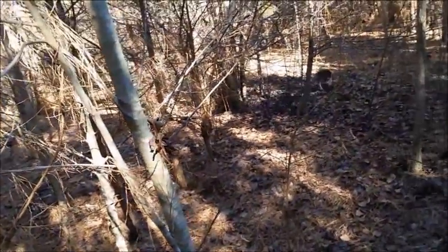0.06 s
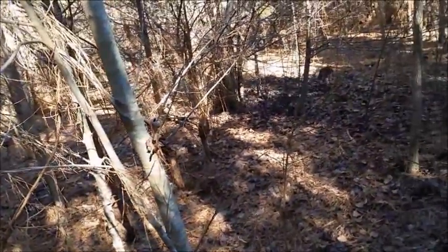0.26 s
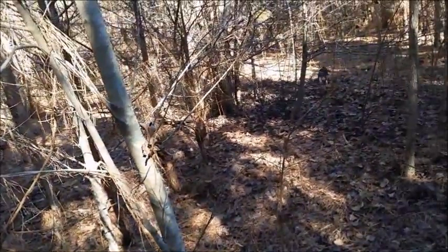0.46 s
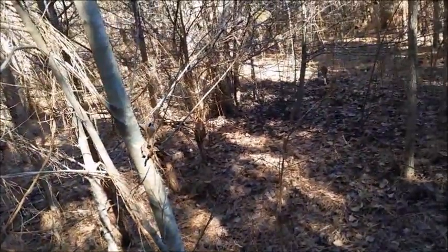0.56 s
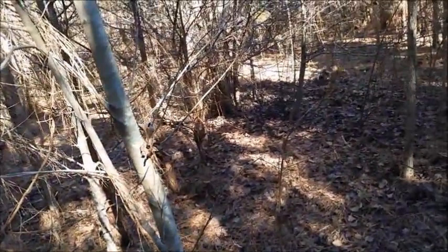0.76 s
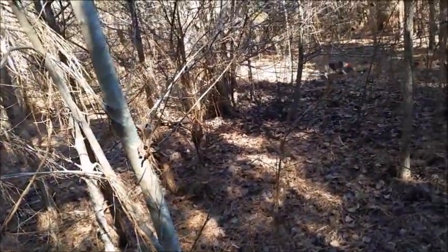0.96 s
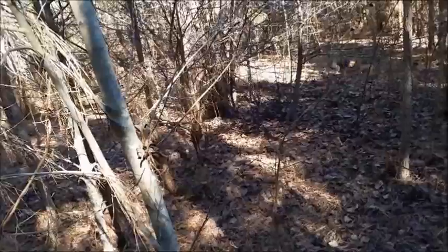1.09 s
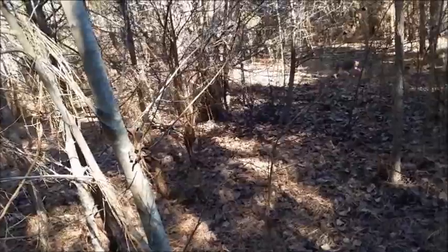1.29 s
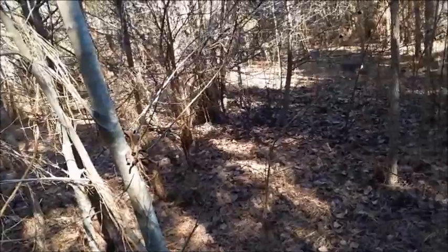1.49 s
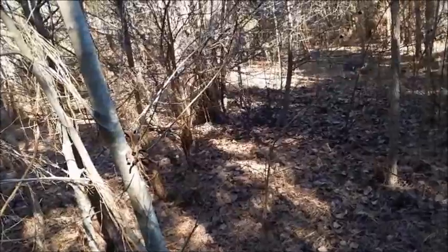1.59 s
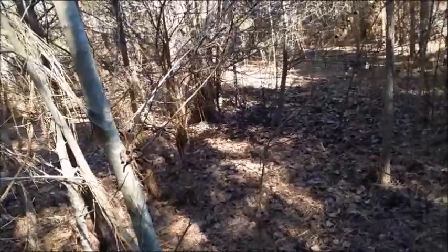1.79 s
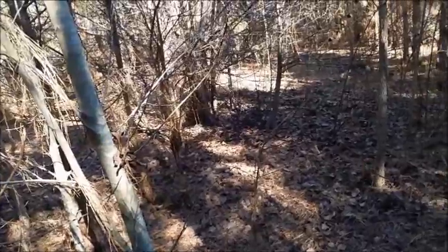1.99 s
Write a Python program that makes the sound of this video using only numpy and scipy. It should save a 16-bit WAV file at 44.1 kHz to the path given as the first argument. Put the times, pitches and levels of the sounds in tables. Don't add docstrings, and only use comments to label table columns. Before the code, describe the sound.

Two high hound bays ring softly among trees, with leaf rustle and knocks on the microphone

```python
import sys
import numpy as np
from scipy import signal
from scipy.fft import rfft, irfft, next_fast_len
from scipy.io import wavfile
from scipy.ndimage import uniform_filter1d, map_coordinates

SR = 44100
rng = np.random.default_rng(int(sys.argv[2]) if len(sys.argv) > 2 else 0)


def gain_from_db(level_db):
    decades = np.asarray(level_db, float) / 20
    return 10 ** decades


def pcm_store(signal):
    levels = np.round(np.clip(np.atleast_2d(signal), -1, 1) * 32767)
    wavfile.write(sys.argv[1], SR, levels.astype(np.int16).T)


N = 90404
TIME = np.arange(N) / SR


def unit(x):
    return x / np.sqrt(np.mean(x ** 2) + 1e-20)


def along(points, hz):
    f, v = np.transpose(points)
    return np.interp(np.log(hz + 1), np.log(f + 1), v)


def curves(rows):
    s, *cols = np.transpose(rows)
    return [np.interp(TIME, s, c) for c in cols]


def wobble(rate):
    return map_coordinates(rng.standard_normal(4000), [np.arange(N) * min(rate, 1500) / SR])


def filtered(x, response):
    m = next_fast_len(N + SR // 2)
    return irfft(rfft(x, m) * response(np.fft.rfftfreq(m, 1 / SR)), m)[..., :N]


def panned(x, pan_db):
    return np.array([x * gain_from_db(pan_db / 2), x * gain_from_db(-pan_db / 2)])


def rush(spectrum, alike, patchy_db):
    z = signal.stft(rng.standard_normal((2, N)), nperseg=512)[2]
    field = uniform_filter1d(rng.standard_normal(z.shape[1:]), size=6, axis=0)
    field = uniform_filter1d(field, size=8, axis=1)
    pair = signal.istft(z * gain_from_db(patchy_db * unit(field)), nperseg=512)[1][:, :N]

    def mid_side(hz):
        turn = np.arccos(np.clip(along(alike, hz), -1, 1)) / 2
        return gain_from_db(along(spectrum, hz)) * [np.cos(turn), np.sin(turn)]

    mid, side = filtered(pair, mid_side)
    return unit(np.array([mid + side, mid - side]))


def add_burst(out, start_s, burst):
    start = round(start_s * SR)
    out[:, start:start + burst.shape[1]] += burst


# hz, level_db_per_hz
AIR = [(250, -7.5), (700, -6.5), (1500, -16.5), (5300, -13), (6000, -62), (9300, -56), (10200, -31.5),
       (12200, -17)]


def thin_air():
    return gain_from_db(-64) * rush(AIR, [(1000, 0.026)], patchy_db=-8.5)


# hz, level_db_per_hz
RUMBLE = [(12, -48.5), (40, -7.5), (108, 4), (166, -10), (185, -12), (308, -19), (500, -28.5), (650, -61),
          (1100, -120)]
# hz, likeness_0_to_1
RUMBLE_LIKENESS = [(30, 0.093), (60, 1), (110, 0.96), (300, 0.87)]
# start_s, level_db
BREEZE = [
    (0, -64.5),
    (.45, -57.5),
    (.58, -53),
    (.9, -51.5),
    (1.05, -59),
    (1.5, -60.5),
    (2.05, -73),
]
# hz, level_db_per_hz
GUST = [(10, -28.5), (22, -8.5), (45, -3.5), (80, -17), (140, -56.5)]
HUM_PATCH_DB = .6


def rumble_and_wind():
    rumble = gain_from_db(-50.5) * rush(RUMBLE, RUMBLE_LIKENESS, HUM_PATCH_DB) * gain_from_db([[-1.5], [1.5]])
    wind = gain_from_db(curves(BREEZE)[0]) * rush(GUST, [(30, 0)], HUM_PATCH_DB) * gain_from_db([[2.5], [-2.5]])
    return rumble + wind


# hz, level_db_per_hz
INSECTS = [(2800, -22.5), (3380, -8), (4150, -3.5), (4700, -15.5), (5600, -27), (6000, -56)]
# hz, level_db_per_hz
FAINT_BANDS = [(5900, -41), (6300, -11), (6800, 0.5), (7250, -10.5), (7800, -1.5), (8300, -8.5), (9200, -2),
               (9900, -33)]
INSECT_PAN_DB = 17


def insects():
    hiss = gain_from_db(-62 + wobble(21)) * rush(INSECTS, [(4000, 0.0)], patchy_db=-2.5)
    hiss = hiss * gain_from_db([[6], [7 - INSECT_PAN_DB]])
    faint_bands = gain_from_db(-76.5) * rush(FAINT_BANDS, [(7000, .1)], patchy_db=2.5) * gain_from_db([[-6], [3]])
    return hiss + faint_bands


# start_s, level_db
DRAG = [
    (.23, -90),
    (.27, -56),
    (.56, -53),
    (.63, -60),
    (.68, -90),
]
# hz, level_db_per_hz
SCRAPE = [(7800, -50), (8400, -12), (9300, -7), (10800, 0), (12800, -24)]
# start_s, level_db
SQUEAK = [
    (0.499, -96),
    (.53, -47),
    (.58, -50),
    (.61, -92),
]
SQUEAK_HZ = 10600


def branch():
    squeak = np.sin(2 * np.pi * SQUEAK_HZ * TIME + 0.9 * wobble(80))
    squeak = gain_from_db(curves(SQUEAK)[0] + 2.5 * wobble(44)) * squeak
    scrape = gain_from_db(curves(DRAG)[0] + 0.41 * wobble(26)) * rush(SCRAPE, [(9000, 0.11)], patchy_db=5.0)
    return (scrape + squeak) * gain_from_db([[5], [-11]])


# start_s, strength_db
RUSTLE = [(0.0, -62), (.11, -52.5), (0.182, -51), (0.218, -63), (.26, -49.5), (.63, -52), (0.659, -56.5),
          (.77, -67.5), (.8, -49), (0.922, -47), (1.04, -52), (1.209, -52), (1.271, -73), (1.38, -62),
          (1.5, -73.5), (1.63, -54.5), (1.78, -70), (1.878, -62.5)]
# hz, level_db_per_hz
LEAVES = [(300, -26), (2800, -21), (5300, -30), (6000, -55), (8800, -50), (9800, -13), (10800, -3),
          (14000, 0)]
# start_s, peak_db
SNAPS = [
    (0.692, -46),
    (.791, -42),
    (1.619, -29),
    (1.905, -43),
]
# start_s, peak_db
SCUFFS = [(0.0238, -45), (0.0628, -45.5), (0.1025, -39.5), (0.179, -42), (0.2556, -35.5), (0.3574, -35),
          (0.6285, -39), (0.8215, -37), (0.9039, -36), (1.061, -38.5), (1.3623, -46), (1.5848, -44),
          (1.8642, -43)]
CRACKLE_DB, CRACKLE_RATE = -9, 350
SNAP_T60_S, SCUFF_T60_S, SCUFF_DB = .012, .11, -.5


def leaves():
    strength_db, = curves(RUSTLE + [(N / SR, RUSTLE[-2][1])])
    colour = lambda hz: gain_from_db(along(LEAVES, hz))
    hits = rng.random((2, N)) < CRACKLE_RATE / SR
    hits = hits * gain_from_db(np.minimum(4 * rng.exponential(size=(2, N)), 9))
    grain = gain_from_db(-60 * np.arange(200) / SR / .003)
    grit = signal.fftconvolve(hits, grain[None], axes=1)[:, :N] * rng.standard_normal((2, N))
    bed = rush(LEAVES, [(9000, 0.22)], patchy_db=-6.0)
    bed = bed * gain_from_db(0.93 * wobble(50.9)) * gain_from_db([[-1.2], [1.2]])
    bed = bed + gain_from_db(CRACKLE_DB) * unit(filtered(grit, colour))

    bursts = np.zeros((2, N + SR))
    t = np.arange(600) / SR
    for s, db in SNAPS:
        add_burst(bursts, s, gain_from_db(db - 60 * t / SNAP_T60_S) * rng.standard_normal((2, len(t))))
    t = np.arange(SR // 8) / SR
    for s, db in SCUFFS:
        fade = gain_from_db(db + SCUFF_DB - 60 * t / SCUFF_T60_S)
        add_burst(bursts, s, fade * rng.standard_normal((2, len(t))))
    return gain_from_db(strength_db + 6.5) * bed + filtered(bursts[:, :N], colour)


# start_s, peak_db, start_hz, t60_s, left_over_right_db (above 0 counts as 0)
BUMPS = [
    (.065, -37, 313, 0.049, 30),
    (1.023, -24.5, 190, 0.079, -1.5),
    (1.4275, -13, 348, 0.036, -25),
    (1.669, -24.5, 203, 0.029, -19),
    (1.6754, -19.5, 516, 0.043, -35.5),
]
SETTLE_HZ, SETTLE_S = 103.1, 0.0021


def bumps():
    out = np.zeros((2, N + SR))
    t = np.arange(SR // 8) / SR
    for s, db, hz, t60, pan_db in BUMPS:
        knock = t60 < .045
        pitch = hz + 0 * t
        if knock:
            pitch = SETTLE_HZ + (hz - SETTLE_HZ) * np.exp(-t / SETTLE_S)
        rise = 1 - np.exp(-t / (.002 if knock else .008))
        push = gain_from_db(db - 60 * t / t60) * rise * np.sin(2 * np.pi * np.cumsum(pitch) / SR)
        add_burst(out, s, push * gain_from_db([[min(pan_db, 0)], [0]]))
    return out[:, :N]


# hz, t60_s
WOOD = [(650, .4), (1300, .5), (1900, .33), (2600, .36), (5000, .3)]
# hz, level_db
ECHO_TINT = [(500, -4), (650, -5), (800, 2), (1300, 0), (1900, -4), (2600, -1), (3500, -1)]
ECHO_GAP_S = .07
STIR_RAD, STIR_RATE = 1.2, 55


def wood(x):
    hz, t, z = signal.stft(rng.standard_normal((2, SR)), SR, nperseg=256)
    fade_db = along(ECHO_TINT, hz)[:, None] - 60 * t / along(WOOD, hz)[:, None]
    tail = signal.istft(z * gain_from_db(fade_db), SR, nperseg=256)[1]
    tail = tail * (1 - np.exp(-np.arange(tail.shape[1]) / SR / ECHO_GAP_S))
    echo = signal.fftconvolve(x[None], tail / np.linalg.norm(tail[0]), axes=1)[:, :N]
    stir = STIR_RAD * np.array([wobble(STIR_RATE), wobble(STIR_RATE)])
    return np.real(signal.hilbert(echo, next_fast_len(N))[:, :N] * np.exp(1j * stir))


# hz, level_db
THROAT = [(250, -1.5), (500, -12.5), (720, 6.5), (1000, -2), (1290, -4), (1950, -7.5), (2600, -24),
          (3600, -32.5)]
# hz, width_hz, level_db
BREATHY = [(700, 280, -2), (1442, 570, -7), (2026, 160, -10.5), (2650, 320, -19)]
# start_s, pitch_hz, level_db
SECOND = [(.205, 685.3, -59), (.222, 700, -41), (.235, 698.5, -23), (.248, 700, -32.5), (.262, 700, -61),
          (.41, 735, -63.5), (.44, 749.4, -31.5), (.51, 755.2, -38), (.56, 700, -48), (.59, 713, -29),
          (.62, 750, -98.5), (.85, 700, -74.5), (.885, 705.4, -38.5), (.91, 750, -31.5), (.93, 727, -89)]
# start_s, slip_rad
CATCHES = [(.2405, 1.6), (.319, 1.3), (.329, -.9), (.421, .6), (.437, -.9), (.455, .5), (.479, 1),
           (.508, -.9), (.885, 1.6), (.915, 2.2)]
# start_s, level_db
MOUTH = [(.2, -4), (.26, 1), (.3, -1), (.42, -6.5), (.5, -12.5), (.53, -1.5), (.6, -2.5), (.635, 17.5),
         (.66, -9.5), (.85, 9), (.92, -10.5), (.96, 5), (.985, 7), (.995, -20.5)]
# start_s, left_over_right_db
HEAD = [
    (.2, -4.5),
    (.3, 1.5),
    (.46, 0.5),
    (.6, 4.5),
    (.86, -2.5),
    (.95, -0.5),
]
BEAT_DEPTH, SHIMMER, SLIP_RAD, AIR_DB, DRIFT_DB = .5, .35, .6, -11, 1.5
CATCH_S, DOUBLING_S, DOUBLING_DB = .0028, .007, 14
SAG_HZ, SAG_DB_PER_HZ = 600, .12
LAG_RAD, SWAY_DB, SWAY_RAD = 0.39, 0.55, 0.08
FIFTH_DB, LOWEST_DB = -15, -6


def breath(phase):
    def throat(f):
        rings = sum((-1) ** k * gain_from_db(db) * 1j * f * w / (c * c - f * f + 1j * f * w)
                    for k, (c, w, db) in enumerate(BREATHY))
        return rings * f ** 4 / (f ** 4 + 560 ** 4) / (1 + (f / 4200) ** 8)

    return unit(filtered(rng.standard_normal(N) * (1 + np.cos(phase)), throat))


def bay(rows):
    pitch, level_db, first_db, rough, half_db, third_db = curves(rows)
    second_hz, second_db = curves(SECOND)
    top_db, = curves(MOUTH)
    pan_db, = curves(HEAD)
    rough = np.clip(rough, 0, 1)
    other = 2 * np.pi * np.cumsum(second_hz) / SR + 0.2 * wobble(27)
    phase = 2 * np.pi * np.cumsum(pitch) / SR + rough * SLIP_RAD * wobble(160)
    phase = phase + sum(rad / 2 * np.tanh((TIME - s) / CATCH_S) for s, rad in CATCHES)
    half_db = half_db + DOUBLING_DB * sum(np.exp(-((TIME - s) / DOUBLING_S) ** 2) for s, _ in CATCHES)
    beat = BEAT_DEPTH * np.minimum(gain_from_db(second_db + 24.5), 1) * np.cos(other - phase)
    own_levels = {1: half_db + 8.5 + LOWEST_DB, 2: first_db, 4: 0, 6: third_db, 8: top_db,
                  10: top_db + FIFTH_DB}
    tone = np.zeros((2, N))
    for half in range(1, 11):
        k = half / 2
        db = along(THROAT, k * pitch) + DRIFT_DB * np.sqrt(k - .5) * wobble(30)
        db = db + own_levels.get(half, half_db + 7)
        db = db - (k > 2) * SAG_DB_PER_HZ * np.maximum(SAG_HZ - pitch, 0)
        turn = np.array([[.5], [-.5]]) * (-LAG_RAD * k + SWAY_RAD * k * k * wobble(9.32))
        size = gain_from_db(db) * (1 + (k - .6) * (rough * SHIMMER * wobble(110) + beat))
        both = panned(size, pan_db / k ** 2 + SWAY_DB * k * wobble(16))
        tone += both * np.sin(k * phase + k * k + turn)
    air = gain_from_db(AIR_DB) * rough * gain_from_db(1.5 * wobble(75)) * breath(phase)
    voiced = gain_from_db(level_db) * (tone + air)
    on = (TIME > rows[0][0]) & (TIME < rows[-1][0])
    gate = uniform_filter1d(1.0 * on, size=200)
    return np.sqrt(2) * gate * (voiced + gain_from_db(second_db) * np.sin(other))


# start_s, pitch_hz, level_db, fundamental_over_rest_db, roughness_0_to_1,
# half_pitch_db, third_harmonic_db
BAY = [(.203, 542, -64, 7, 0.3, -51.5, -14.5), (.215, 564, -46, 13.5, 1, -47.5, -5),
       (.232, 547.7, -39.5, 13.5, 1, -44, 1), (.247, 562.5, -31.5, 10, 0.71, -51, 5.5),
       (.268, 642.8, -22, 5, 0.14, -50, -6.5), (.287, 656.3, -22, 6, 0.2, -22.5, -22),
       (.305, 659.3, -23.5, 6.5, 0.15, -25, -16), (.325, 664.5, -22, 2, 0.65, -48, -14.5),
       (.345, 675.4, -18.5, -2, 0.1, -27.5, -17.5), (.385, 646, -19.5, 1.5, 0.2, -32.5, -13),
       (.405, 648.3, -19.5, 3.5, 0, -53.5, -5.5), (.43, 657.8, -19, 1.5, 0.2, -35.5, -13.5)]
WHINE = [(0.469, 656, -25.5, 8, 0.34, -35.5, -9), (0.511, 667, -24.5, 9, .35, -32, -12.5),
         (0.525, 625, -18, -8.5, 0.18, -66.5, -9), (.565, 620, -18, -11, 0.11, -55, -4.5),
         (0.589, 611, -23.5, -33.5, 0.081, -58.5, -28.5), (0.615, 633, -23.5, -44.5, .04, -39, -24.5),
         (0.632, 596, -33, -37, .04, -67.5, -27.5), (0.65, 346, -38.5, -37, .1, -68, -31.5),
         (.664, 385, -66.5, -3, 0.16, -67, -19.5)]
YELP = [(.844, 532.3, -56, 5, 0.051, -52, 8), (.855, 602, -49, 28, 0.093, -45.5, 3),
        (.875, 605, -33, 13.5, 0.85, -41, -15.5), (.895, 622, -28.5, 8, 0.35, -34, -25.5),
        (.912, 634.8, -29, 5, 1, -26.5, -16), (.925, 625.2, -24.5, 6, 0.091, -46, -11.5),
        (.955, 638, -21.5, -0.5, 0.027, -53, -6), (.988, 625.6, -28.5, -3, 0.15, -53, -7.5),
        (.998, 556, -39, 20, 0.54, -49, -4), (1.013, 364, -44, -14, 0.55, -65.5, -28.5)]
ECHO_DB = -17.5


def hound():
    calls = [bay(BAY + WHINE), bay(YELP)]
    return sum(calls) + gain_from_db(ECHO_DB) * sum(wood(c.mean(axis=0)) for c in calls)


def scene():
    background = insects() + rumble_and_wind() + thin_air()
    return background + bumps() + leaves() + branch() + hound()


GATE_LOW_HZ, GATE_HIGH_HZ, KEPT = 4600, 10000, .34
MASK_DB, MASK_GROWS = -38, .5


def thrifty(x):
    hz, _, z = signal.stft(x, SR, nperseg=1024)
    power = uniform_filter1d(uniform_filter1d(abs(z) ** 2, size=9, axis=1), size=3, axis=2)
    bar = (1 + power.sum(axis=1, keepdims=True) / gain_from_db(2 * MASK_DB)) ** MASK_GROWS
    power = power[:, np.arange(len(hz)) // 8 * 8] / bar
    inside = (hz > GATE_LOW_HZ) & (hz < GATE_HIGH_HZ)
    weak = inside[:, None] & (power < np.quantile(power[:, inside], 1 - KEPT))
    return signal.istft(z * ~weak, SR, nperseg=1024)[1][:, :N]


def low_pass(x):
    return signal.sosfilt(signal.butter(12, 15800, fs=SR, output="sos"), x)


def record(dry):
    limited = filtered(dry, lambda hz: hz < 14680)
    return low_pass(thrifty(limited))


dry = scene()
out = record(dry)
pcm_store(out)
```